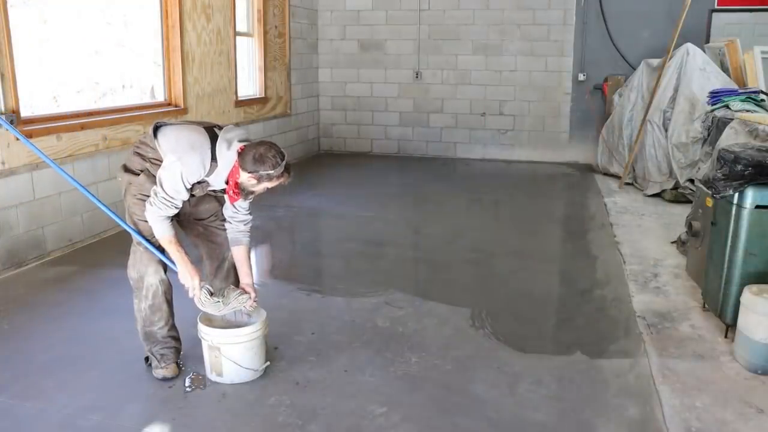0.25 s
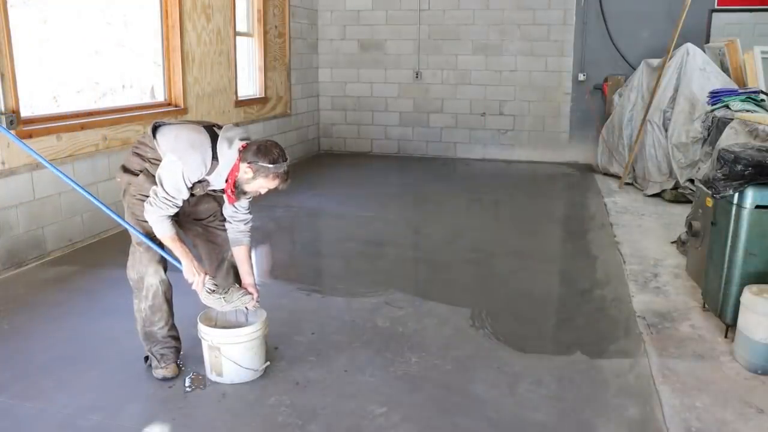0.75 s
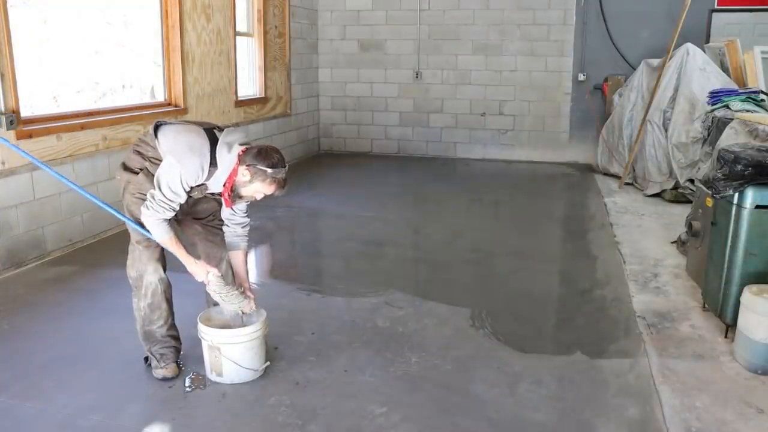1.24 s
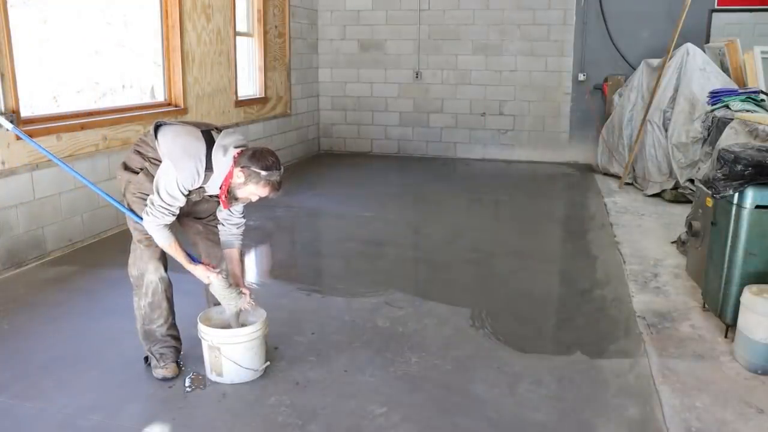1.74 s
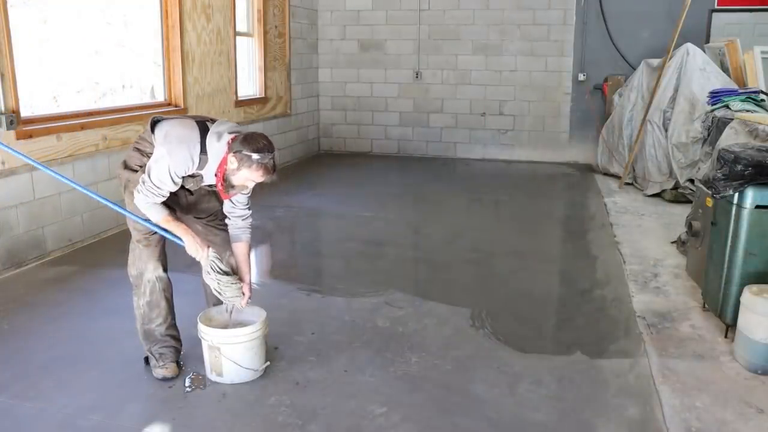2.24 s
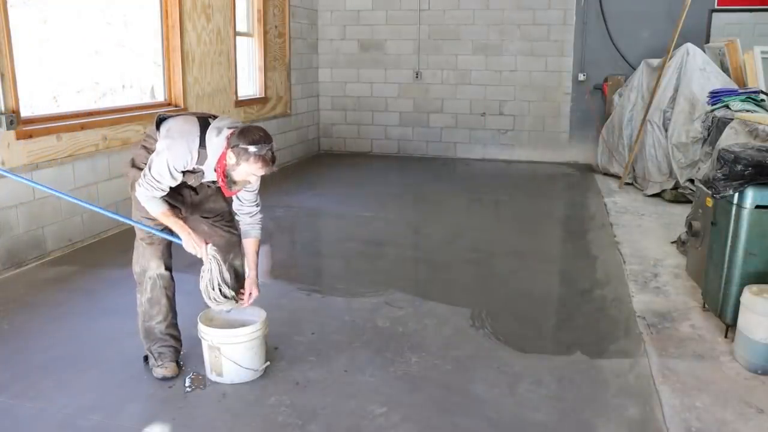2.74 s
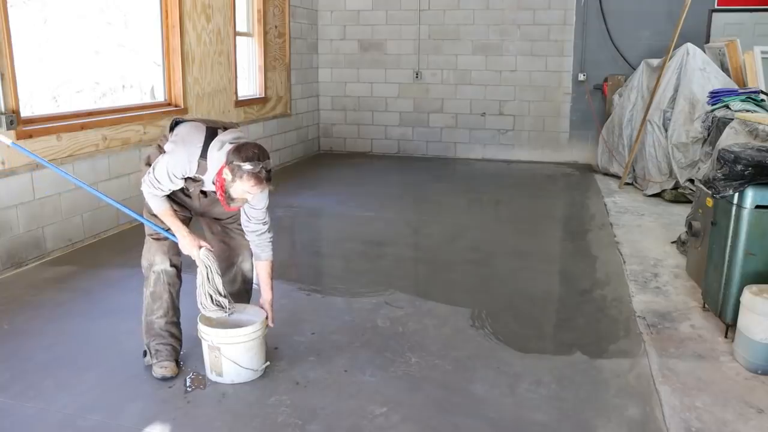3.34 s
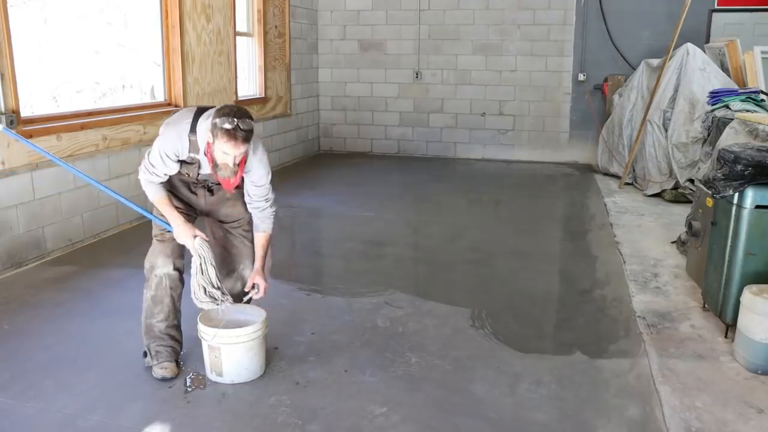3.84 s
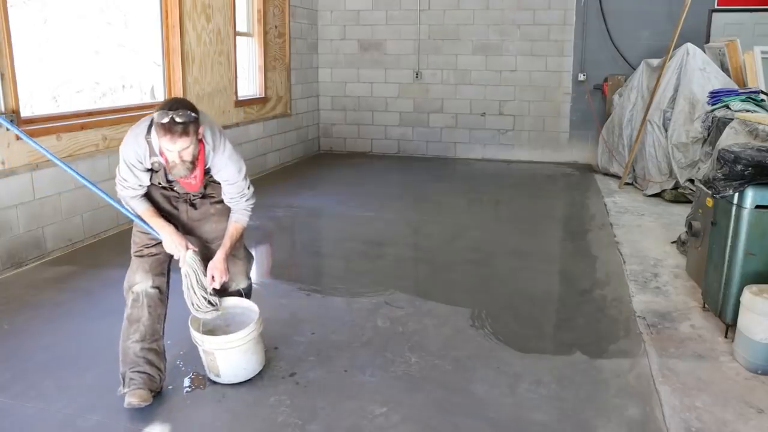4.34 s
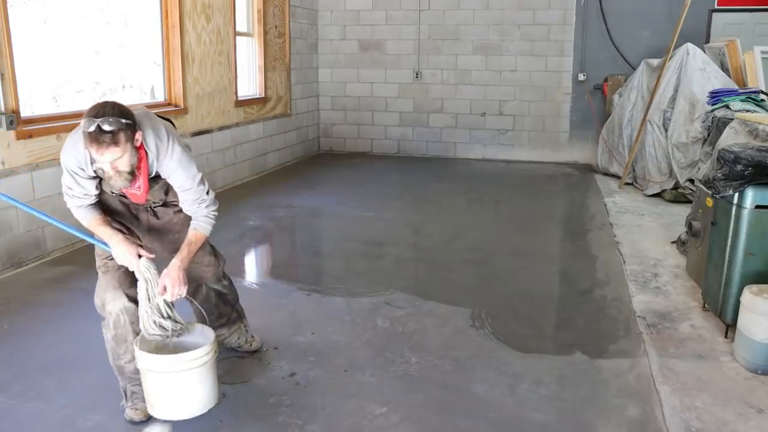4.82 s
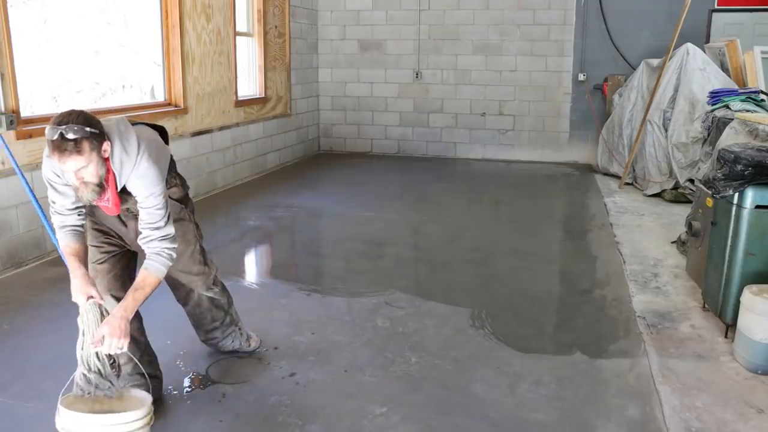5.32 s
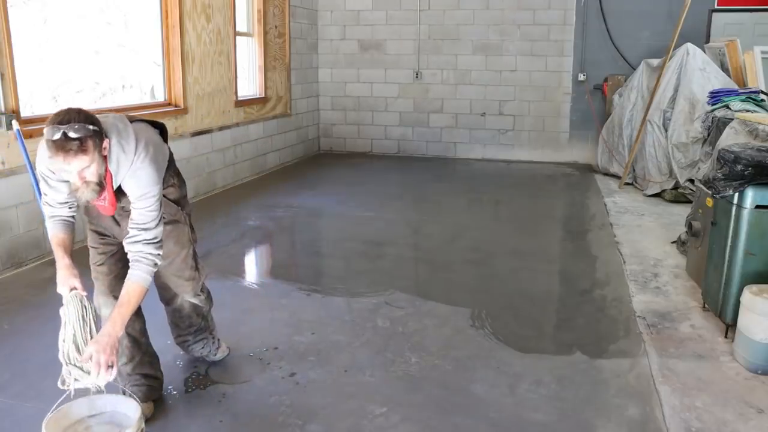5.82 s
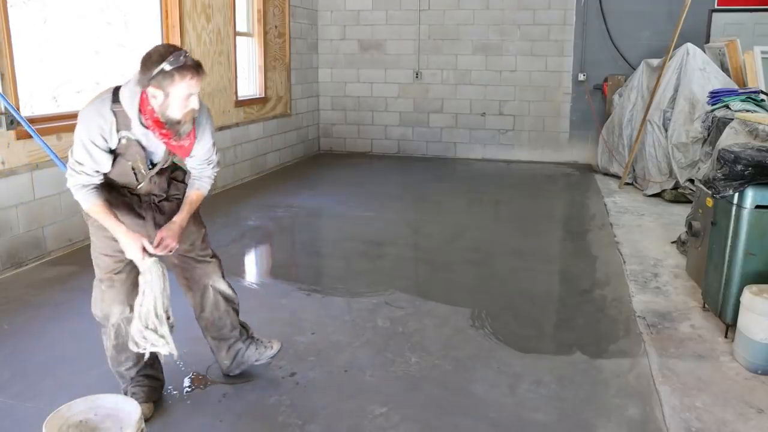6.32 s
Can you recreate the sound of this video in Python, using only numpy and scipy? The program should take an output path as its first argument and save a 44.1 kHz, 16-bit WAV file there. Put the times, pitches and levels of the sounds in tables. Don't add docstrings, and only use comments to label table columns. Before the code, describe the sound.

Water drips and trickles from a hand-wrung mop into a plastic bucket, then the wire handle rattles, the bucket thumps down and its handle clatters.

```python
import sys
import numpy as np
from scipy import signal
from scipy.fft import rfft, irfft
from scipy.io import wavfile
from scipy.ndimage import uniform_filter1d, minimum_filter1d

SR = 44100
rng = np.random.default_rng(int(sys.argv[2]) if len(sys.argv) > 2 else 0)


def to_wav(s):
    ch = np.atleast_2d(s).T
    pcm = np.round(np.clip(ch, -1, 1) * 32767)
    wavfile.write(sys.argv[1], SR, pcm.astype(np.int16))


def volts_from_db(level):
    exponent = np.asarray(level, float) / 20
    return 10 ** exponent


N = 289737
T = np.arange(N) / SR

# (time [s], flow [dB], thickness [dB])
FLOW = [(0.0, -64, 0), (0.2, -72, -24), (0.47, -76.5, 28), (0.6, -85, 18), (0.765, -80, -30),
        (0.815, -51.5, -28), (0.88, -56, -16), (0.99, -66, 3), (1.23, -55.5, 1.5), (1.34, -52.5, 1.5),
        (1.42, -55.5, 4.5), (1.62, -49.5, 2.5), (1.97, -60, 11.5), (2.03, -50, 5), (2.36, -71, 13),
        (2.55, -72, -1), (3.0, -110, 25)]
# (time [s], peak [dB], pitch [Hz])
DROPS = [(0.111, -50.5, 1720), (0.158, -49.5, 1350), (0.186, -53, 1105), (0.266, -52.5, 866),
         (0.337, -52, 965), (0.388, -53, 1185), (0.284, -67, 950), (0.308, -53, 930), (0.341, -52, 1380),
         (0.408, -55, 1090), (0.8, -52, 930), (0.93, -47, 864), (0.996, -51, 726), (1.033, -52, 760),
         (1.053, -48.5, 896), (1.142, -55, 1220), (1.184, -52.5, 1210), (1.24, -50, 1300),
         (1.322, -58, 706), (1.37, -48.5, 910), (1.473, -49, 894), (1.531, -50, 870), (1.621, -54, 836),
         (1.691, -60, 600), (1.717, -51.5, 810), (1.875, -54, 895), (2.04, -51, 900), (2.143, -57, 803),
         (2.193, -52.5, 935), (2.289, -46, 1230), (2.317, -53, 974), (2.504, -62, 1230),
         (0.865, -47.5, 864), (0.883, -60, 865), (0.921, -71, 2320), (0.988, -56, 2500), (1.003, -58, 2130),
         (1.016, -52.5, 1980), (1.041, -64, 4100), (1.087, -53, 930), (1.188, -47, 2100),
         (1.82, -43.5, 3000), (1.76, -46.5, 1920), (1.879, -45, 2740), (2.165, -59, 3760), (2.2, -48, 3900),
         (2.212, -51, 3600), (1.538, -56, 2360), (1.66, -47, 3900)]
# (time [s], peak [dB], pitch [Hz])
DROPLETS = [(0.1104, -42.5, 2160), (0.155, -52, 1580), (0.2728, -54.5, 2100), (0.3047, -56, 1970),
            (0.4055, -53, 2050), (0.421, -55, 2430), (0.456, -53.5, 2020), (0.552, -59, 2200),
            (0.64, -61, 1740), (0.5617, -56.5, 1710), (0.7262, -52.5, 2170), (0.8135, -58, 1690),
            (0.8468, -46, 3080), (0.8965, -43.5, 3090), (1.03, -46, 3900), (1.083, -52, 1940),
            (1.1633, -47.5, 1880), (1.1806, -48, 1710), (1.2025, -47, 2650), (1.3254, -46, 2050),
            (1.4481, -46, 1990), (1.474, -44.5, 3030), (1.5204, -48, 2200), (1.594, -42, 2390),
            (1.6456, -38.5, 3900), (1.7459, -54, 1930), (1.8193, -46, 1970), (1.8736, -52, 2050),
            (2.118, -45, 3600), (2.193, -45, 4050), (2.3187, -47.5, 3250), (2.5053, -55.5, 3160),
            (2.7876, -55, 3380), (0.7833, -55, 3170), (0.8706, -55, 3070), (0.8781, -53, 3320),
            (0.9395, -70, 3220), (1.1176, -51, 2200), (1.2857, -54, 3990), (1.577, -48, 2280),
            (1.633, -53, 2500), (1.6938, -48, 3460), (1.827, -43.5, 2100), (1.881, -47, 3150),
            (1.95, -51.5, 2100), (2.0365, -45, 3500), (2.132, -46, 3300), (2.17, -52, 2300),
            (2.272, -52.5, 2100), (2.3408, -72, 3430), (2.4306, -56.5, 2080), (4.686, -55.5, 2870),
            (4.725, -57, 3480), (4.98, -58.5, 3500)]
# (time [s], peak [dB], pitch [Hz])
GULPS = [(1.368, -43, 640), (1.398, -44.5, 583), (1.412, -40, 600), (1.43, -43, 616), (1.448, -46, 600),
         (1.544, -43, 456), (1.654, -44, 334), (1.698, -43, 320), (1.756, -46.5, 306), (1.859, -50, 482),
         (2.039, -47, 704), (2.189, -62, 442)]
# (time [s], peak [dB], pitch [Hz])
PLOPS = [
    (0.2257, -41, 930),
    (0.836, -46, 840),
]
# (time [s], peak [dB], centre [Hz])
SPLASH = [(0.1075, -61, 4660), (0.2068, -59, 4750), (0.2597, -60, 4920), (0.352, -60, 7660),
          (0.382, -59, 5090), (0.4204, -59, 5760), (0.486, -55, 6900), (0.5447, -60, 6000),
          (0.6215, -59, 5700), (0.7137, -63, 6140), (0.816, -71, 4530), (1.0201, -58, 5250),
          (1.2003, -41.5, 4470), (1.255, -45, 4680), (1.3248, -43, 2400), (1.3704, -43, 2400),
          (1.392, -45.5, 4850), (1.4654, -40.5, 4620), (1.4992, -43, 4600), (1.6157, -39.5, 6530),
          (1.6427, -35.5, 4300), (1.701, -46, 4940), (1.848, -49, 7500), (1.8727, -45.5, 4500),
          (2.0065, -49, 4970), (2.0783, -44, 4900), (2.083, -56, 5120), (2.148, -55, 5800),
          (2.1644, -54, 4630), (2.1971, -50, 4690), (2.2878, -54, 4500), (2.317, -49, 10800),
          (2.373, -56, 4700), (2.5027, -62, 5420), (2.5576, -54, 4600), (2.7067, -59, 6300)]
# (frequency [Hz], density [dB/Hz])
SPRAY = [(590, -21), (1000, 13.5), (1200, 6), (2080, -46), (2870, 2), (3800, 10.5), (5310, 1), (14100, -52),
         (16000, -48)]

# (time [s], peak [dB], body [dB], tick [dB], contact [ms])
LIFT = [(3.3765, -25, -20, -7.5, 5.7), (3.382, -36, -36, -20, 2.2), (3.387, -30, -11, -7, 2.2),
        (3.395, -37, -18, -30, 5), (3.404, -31.5, -22, -19, 4.6), (3.409, -37.5, -14, -30, 3.2),
        (3.4365, -38, -19, -36, 5), (3.4415, -30.5, -23.5, 0, 3.5), (3.454, -30.5, -43, 11.5, 1.9),
        (3.462, -48, -25, -12, 2.7), (3.513, -52, -25, -20, 12), (3.524, -38, -41, 6.5, 1.6)]
SWING = [
    (3.736, -38, -27, -1.5, 16),
    (3.791, -45.5, -14, 2, 11),
    (3.8805, -50.5, -14, 20.5, 9),
    (3.892, -49, -17, 4, 12),
    (3.911, -51, -18, 9, 4.1),
    (3.923, -43.5, -19.5, -31, 32),
    (3.991, -37, -14.5, 1.5, 8.3),
    (4.053, -39.5, -12.5, -39, 11),
    (4.101, -31, -15.5, -33, 7.2),
    (4.129, -50, -11, -27, 5.4),
]
TAUT = [
    (4.2285, -23, -8, -10, 2.7),
    (4.2305, -14, -12.5, -3.5, 6.8),
]
CREAK = [(4.098, -33, -15, -26, 6), (4.137, -49, 4, -30, 6.8), (4.168, -47, -13, -30, 6.7),
         (4.19, -44, -10, -30, 8), (4.21, -43, -6, -30, 8), (4.351, -46, -16, -12, 5.4),
         (5.577, -35, -20, -25, 5), (5.709, -24.5, -15, -20, 6.6), (5.72, -30.5, -21, -20, 3.3),
         (5.745, -24.5, -20, -21, 6), (3.745, -52.5, -20, -30, 6.9), (3.775, -54, -25, -30, 8),
         (3.81, -49, -22, -30, 7), (3.821, -52, -17, -30, 8.7), (3.858, -58, -20, 14, 4),
         (3.903, -55, -20, 22, 4), (3.929, -50, -22, 8, 11), (3.937, -48, -16, -3, 7.4),
         (3.95, -50, -20, -30, 7), (6.025, -51, -17, -30, 8)]
LAND = [
    (5.538, -22.5, -0.5, -36, 4.5),
    (5.551, -32, 7.5, 0, 4.6),
]
SET_DOWN = [
    (5.706, -25, -37, -30, 12),
    (5.714, -18, -10.5, -19, 12.5),
    (5.779, -30, -1.5, -28, 4.2),
    (5.819, -29.5, -7, -37, 9.4),
]
ROCK = [
    (5.738, -15, -9.5, -37, 5.3),
]
NUDGE = [
    (5.993, -31.5, -39, -15, 9.5),
    (6.024, -45, -34.5, -34, 13),
]
DROP = [(6.287, -31, -31, -16, 11), (6.295, -8, -24, 6, 11.6), (6.3, -13, -17, -11, 5.3),
        (6.31, -9.5, -22, 6, 5.4), (6.304, -3, -35, -13, 6.2), (6.317, -6.5, -44, -3, 3.6),
        (6.332, -39, -34, -17, 3.9), (6.344, -12, -22.5, -7, 3.4), (6.378, -45, -30, -26, 4.7),
        (6.541, -16, -45, 3, 6.4), (6.548, -19, -30, -8, 17), (6.553, -24.5, -21.5, -18, 4.2),
        (6.562, -22, -21, 7.5, 25)]

# (frequency [Hz], width [Hz], level [dB])
WALL_LIFT = [(930, 86, 10.5), (1140, 180, -32), (1390, 120, 14.5), (1760, 150, -2), (1940, 210, 13.5),
             (2700, 250, 8.5), (3030, 810, 12), (3900, 270, 3.5)]
WALL_SWING = [(914, 104, 16), (1390, 140, 15.5), (1640, 150, 15.5), (2100, 160, 13), (2650, 290, 4),
              (3600, 190, 11.5)]
WALL_TAUT = [(900, 80, 1), (1347, 68, 7.5), (1412, 63, 4.5), (1050, 120, -8), (2080, 160, 6.5),
             (2600, 73, -0.5), (3250, 280, 7.5), (3750, 260, -1), (3840, 200, 5), (4700, 350, -11)]
WALL_CREAK = [(917, 47, 3.5), (1105, 40, -4.5), (1350, 80, -2.5), (1700, 99, 4), (2050, 130, 0),
              (3300, 540, -4)]
WALL_LAND = [(900, 140, 7.5), (956, 88, 3), (1281, 81, -4), (1680, 200, -2.5), (2550, 180, -10)]
WALL_SET = [(640, 130, 13.7), (876, 150, 10.6), (1300, 210, 9.2), (1550, 220, 6.2), (2280, 400, 3.3),
            (3600, 510, 6.6)]
WALL_ROCK = [(750, 110, 3), (1030, 170, 18.5), (1560, 175, 16), (2080, 180, 7), (2500, 200, 4),
             (3400, 540, 17.5), (4170, 280, 9)]
WALL_NUDGE = [(950, 180, 10.5), (1530, 140, 10), (2200, 160, 5), (2750, 67, -4), (4050, 570, 12)]
WALL_DROP = [(855, 25.7, 9.7), (895, 51, 13), (974, 67, 7.5), (1140, 110, 10), (1230, 260, 9.9),
             (1467, 61, 7), (1380, 140, 7.4), (2494, 153, 13.6), (2710, 190, 11), (3000, 160, 14),
             (3600, 230, 7.3), (3910, 180, 7.1), (4440, 500, 8.8), (5800, 570, 20)]
# (frequency [Hz], width [Hz], level [dB])
BODY = [(105, 20, -7), (161, 33, -34), (204, 45, 2.5), (252, 6.5, -2), (333.6, 6.6, -14.5), (430, 18, 5),
        (480, 4.7, -30), (554, 35, 11.5)]
BODY_TAUT = [(237, 45, 2.5), (409, 40, -2), (466, 31, -5.5), (600, 100, 6.5)]
BODY_LAND = [(211, 40, 1), (272, 10.1, -2.5), (338, 92, -2), (426, 36, 6), (491, 30, -4.5)]
BODY_SET = [(105, 22, -12), (192, 39, -3.5), (269, 19, -1), (331, 55, -3.5), (425, 32, -1.5),
            (529, 40, 2.5), (640, 120, 3)]
BODY_DROP = [(198, 36, -3), (248, 30, -4.5), (343, 36, -7), (433, 19, 2), (555, 76, 0), (716, 95, -6.5)]
# (frequency [Hz], density [dB/Hz])
CRACK = [(180, -51), (300, 3.5), (767, -8), (897, -23), (1030, -0.5), (1540, -1.5), (1910, -7.5),
         (2300, -6), (3830, -12.5), (9000, -37), (11700, -92), (19800, -120)]

# (time [s], peak [dB], grit [dB], thud [Hz])
STEPS = [(2.097, -53, -8, 154), (2.168, -54, -7, 84.5), (4.282, -31.5, -18, 144), (4.36, -41, -19, 191),
         (4.433, -53, -16, 385), (4.605, -49, -15, 141.4), (4.656, -50, -6, 330), (4.671, -48.5, 1, 179),
         (4.689, -58, 13.5, 178), (4.729, -47.5, -15, 296), (4.84, -52, -21, 353), (5.546, -29, -23, 135),
         (5.828, -43, -27, 71.6), (5.921, -57, -24, 170), (6.02, -49, -16, 76.4), (6.481, -38, -61, 96)]
# (time [s], level [dB])
SCRAPE = [
    (5.56, -50),
    (5.664, -48),
    (5.718, -37.5),
    (5.73, -61),
]
# (frequency [Hz], density [dB/Hz])
AIR = [(15, -77), (25, -11), (123, -11.5), (206, -9.5), (242, -15), (270, -9.5), (476, -8.5), (531, -11),
       (734, -10), (863, -9.5), (1190, -10), (2280, -13.5), (3620, -15), (5730, -25), (11000, -34),
       (16000, -34.5)]
# (frequency [Hz], level [dB rms])
HUM = [(119.5, -88.5), (240, -75.5), (1184, -84)]
# (frequency [Hz], T60 [s])
ROOM_T60 = [(125, 0.61), (250, 0.81), (500, 0.9), (1000, 0.55), (2000, 0.63), (4000, 0.51), (8000, 0.35),
            (14000, 0.19)]
# (delay [s], level [dB])
ECHOES = [(.005, -24), (.011, -11.5), (.021, -17.5), (0.039, -15), (.052, -62), (.083, -21), (.122, -22.5)]


def unit(x):
    return x / np.sqrt(np.mean(x ** 2))


def peak(x, db):
    return x * volts_from_db(db) / np.abs(x).max()


def band(x, lo_hz, hi_hz):
    return signal.sosfilt(signal.butter(2, [lo_hz, hi_hz], "band", fs=SR, output="sos"), x)


def colour(x, points):
    hz, db = np.transpose(points)
    log_hz = np.log(np.arange(len(x) // 2 + 1) * SR / len(x) + 1)
    return irfft(rfft(x) * volts_from_db(np.interp(log_hz, np.log(hz), db)), len(x))


def curve(table, column, outside_db=-140):
    rows = np.array(table)
    return volts_from_db(np.interp(T, rows[:, 0], rows[:, column], outside_db, outside_db))


def walk(rate_hz):
    k = int(SR / rate_hz)
    steps = np.repeat(rng.standard_normal(N // k + 1), k)
    return unit(uniform_filter1d(uniform_filter1d(steps, k), k)[:N])


def add(out, time_s, x):
    i = int(time_s * SR)
    out[i:i + len(x)] += x[:N - i]


def burst(ms, seed):
    t = np.arange(len(seed)) / (ms * SR / 1000)
    tones = rfft(seed * (1 - np.exp(-4 * t)) * np.exp(-t))
    even = irfft(tones / (np.abs(tones) + 1e-9) ** .8, len(seed))
    return even * (1 - np.exp(-6 * t)) * np.exp(-t / 5)


def bubble(hz, cycles, glide):
    ring_s = cycles / hz
    t = np.arange(int(2.5 * ring_s * SR) + 8) / SR
    shape = (1 - np.exp(-5 * t / ring_s)) * np.exp(-(t / ring_s) ** 3)
    return shape / shape.max() * np.sin(2 * np.pi * hz * (t + glide * t ** 2 / (2 * ring_s)))


def drops():
    out = np.zeros(N)
    for s, db, hz in DROPS:
        add(out, s - .003, volts_from_db(db) * bubble(hz, cycles=9.2, glide=0.022))
    for (s, db, hz), seed in zip(DROPLETS, rng.standard_normal((len(DROPLETS), 600))):
        slap = peak(band(burst(7.2, seed), 1200, 3700), db - 5.0)
        add(out, s - .001, volts_from_db(db) * bubble(hz, cycles=10.2, glide=0.069))
        add(out, s - .001, slap)
    for s, db, hz in GULPS:
        add(out, s - .005, volts_from_db(db - 9.0) * bubble(hz, cycles=8.4, glide=0.036))
    for s, db, hz in PLOPS:
        add(out, s - .004, volts_from_db(db) * bubble(hz, cycles=10.3, glide=0.023))
    half_band = 2 ** 0.47
    for (s, db, hz), seed in zip(SPLASH, rng.standard_normal((len(SPLASH), 400))):
        add(out, s, peak(band(burst(1.9, seed), hz / half_band, hz * half_band), db + 0.5))
    return out


def swarm(count, lo_hz, hi_hz, cycles, spread_db):
    out = np.zeros(N)
    for when, size, ring, loud in rng.random((count, 4)):
        hz = lo_hz * (hi_hz / lo_hz) ** size
        gain_db = -spread_db * np.log(1 - .98 * loud)
        add(out, 3 * when, volts_from_db(gain_db) * bubble(hz, cycles * (0.2 + ring), glide=0.13))
    return out / np.std(out[:3 * SR])


def stream():
    flow, thickness = curve(FLOW, 1), curve(FLOW, 2)
    fizz = swarm(count=1500, lo_hz=1250, hi_hz=4300, cycles=7.6, spread_db=2.5)
    gurgle = swarm(count=200, lo_hz=313, hi_hz=880, cycles=1.21, spread_db=4)
    specks = (rng.random(N) < 1500 / SR) * rng.standard_normal(N)
    specks = specks * volts_from_db(np.minimum(rng.exponential(size=N), 3))
    specks = specks * volts_from_db(3 * walk(rate_hz=70))
    spray = unit(colour(specks, SPRAY))
    mist = unit(band(specks, 1800, 12000))
    water = volts_from_db(-6) * fizz + volts_from_db(-10) * spray
    water = water + volts_from_db(-14.5) * thickness ** 0.77 * gurgle
    water = water + volts_from_db(-17.5) * thickness ** 0.37 * mist
    return flow * water


def modes(peaks, rise_ms, chance):
    t = np.arange(8192) / SR
    ring = np.zeros(len(t))
    for (hz, width_hz, db), (a, b) in zip(peaks, chance):
        decay = volts_from_db(db + 1.5 * a) * np.exp(-np.pi * width_hz * t)
        ring += decay * np.sin(2 * np.pi * (hz * (1 + b / 250) * t + a))
    return ring * (1 - np.exp(-t * 1000 / rise_ms)) ** 2


def knocks(events, wall, body, crack_db, tick_hz=8700, tick_lo_hz=2400, tick_share=.45):
    out = np.zeros(N)
    for (s, db, body_db, tick_db, ms), seed in zip(events, rng.standard_normal((len(events), 4096))):
        chance = seed[-40:].reshape(-1, 2)
        crack = peak(colour(burst(ms, seed), CRACK) * np.hanning(8192)[4096:], crack_db)
        thump = band(modes(body, 0.32, chance), 59, 1130)
        tick = band(burst(tick_share * ms, seed), tick_lo_hz, tick_hz)
        start_s = s - .0003
        add(out, start_s, volts_from_db(db) * peak(modes(wall, 0.1 * ms, chance), -3.0))
        add(out, start_s, volts_from_db(db) * band(crack, 794, 9700))
        add(out, start_s, peak(thump, db + body_db - 2.5))
        add(out, start_s, peak(tick, db + tick_db - 17.5))
    return out


def handle_lifted():
    lift = knocks(LIFT, WALL_LIFT, BODY, crack_db=-6)
    return lift + knocks(SWING, WALL_SWING, BODY, crack_db=-7.5, tick_hz=14400, tick_lo_hz=4900,
                         tick_share=0.17)


def bucket_landed():
    land = knocks(LAND, WALL_LAND, BODY_LAND, crack_db=-10.5)
    settle = knocks(SET_DOWN, WALL_SET, BODY_SET, crack_db=-14)
    rock = knocks(ROCK, WALL_ROCK, BODY_SET, crack_db=-10)
    return land + settle + rock + knocks(NUDGE, WALL_NUDGE, BODY, crack_db=-11)


def boots_and_scrape():
    out = np.zeros(N)
    for (s, db, grit_db, hz), seed in zip(STEPS, rng.standard_normal((len(STEPS), 200))):
        add(out, s - .004, volts_from_db(db - 8.0) * bubble(hz, cycles=1.29, glide=0.076))
        add(out, s, peak(band(burst(0.64, seed), 2600, 9600), db + grit_db - 0.5))
    grit = (rng.random(N) < 3000 / SR) * rng.standard_normal(N)
    return out + volts_from_db(-10.5) * curve(SCRAPE, 1) * unit(band(grit, 760, 4460))


def air():
    noise = colour(rng.standard_normal(N), AIR)
    noise = noise * volts_from_db(-67.5) / np.std(band(noise, 390, 16000)) * volts_from_db(.5 * walk(6.4))
    drift_s = T + np.cumsum(0.0056 * walk(0.76)) / SR
    hum = np.zeros(N)
    for hz, db in HUM:
        hum += np.sqrt(2) * volts_from_db(db + 0.7 * walk(25)) * np.sin(2 * np.pi * hz * drift_s)
    return noise + hum


def room(tail_db):
    t = np.arange(SR) / SR
    tail = np.zeros(SR)
    for hz, t60_s in ROOM_T60:
        tail += band(rng.standard_normal(SR), hz / 1.52, hz * 1.394) * 1000. ** (-t / t60_s)
    tail = tail * (1 - np.exp(-t / .012))
    slaps = np.zeros(SR)
    for k, (s, db) in enumerate(ECHOES):
        slaps[int(s * SR)] = (-1) ** k * volts_from_db(db)
    response = volts_from_db(tail_db) * tail / np.sqrt(np.sum(tail ** 2)) + band(slaps, 62, 3600)
    response[0] += 1
    return response


def heard(x, tail_db):
    return signal.fftconvolve(x, room(tail_db))[:N]


def scene():
    lifted = handle_lifted()
    taut = knocks(TAUT, WALL_TAUT, BODY_TAUT, crack_db=-8, tick_hz=11200)
    landed = bucket_landed()
    dropped = knocks(DROP, WALL_DROP, BODY_DROP, crack_db=-4)
    water = band(drops() + stream(), 140, 19000)
    mix = heard(water, tail_db=-7.5)
    mix += heard(lifted, tail_db=-8.5)
    mix += heard(taut, tail_db=-8.5)
    mix += heard(landed, tail_db=-7.5)
    mix += heard(dropped, tail_db=-10)
    mix += heard(boots_and_scrape(), tail_db=-5.5)
    mix += air()
    creak = knocks(CREAK, WALL_CREAK, BODY_TAUT, crack_db=-20, tick_lo_hz=4500)
    mix += heard(creak, tail_db=-6)
    return mix[None]


def band_limit(x):
    return signal.sosfilt(signal.butter(12, 16430, fs=SR, output="sos"), x)


def record(dry):
    thin = signal.sosfilt(signal.butter(1, 50, "high", fs=SR, output="sos"), dry)
    gain = np.minimum(1, volts_from_db(-11.5) / (np.abs(thin) + 1e-9)) ** .7
    held = thin * uniform_filter1d(minimum_filter1d(gain, size=301), size=301)
    mix = signal.sosfilt(signal.ellip(8, .2, 60, 15900, fs=SR, output="sos"), held)
    return band_limit(mix)


dry = scene()
out = record(dry)
to_wav(out)
```